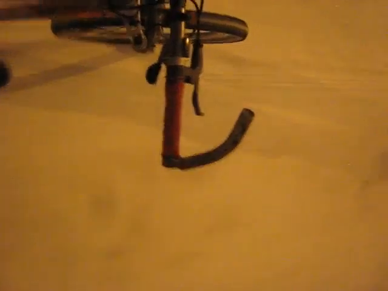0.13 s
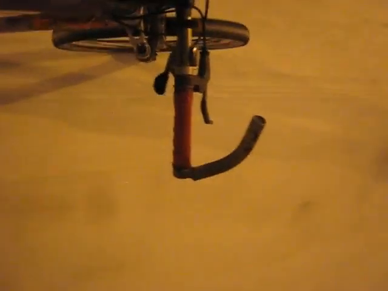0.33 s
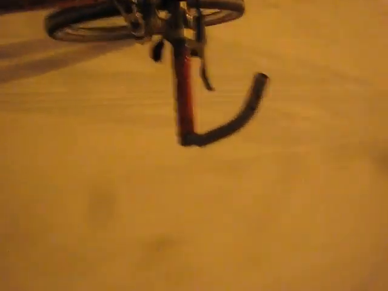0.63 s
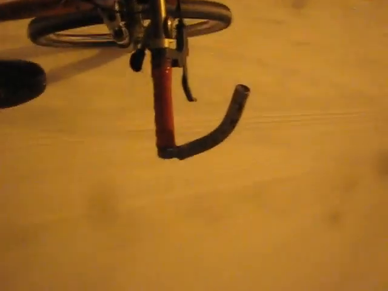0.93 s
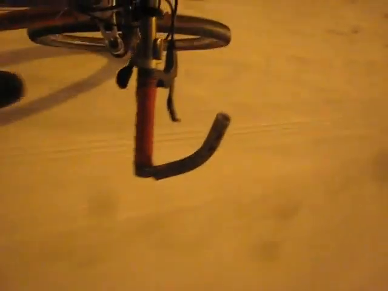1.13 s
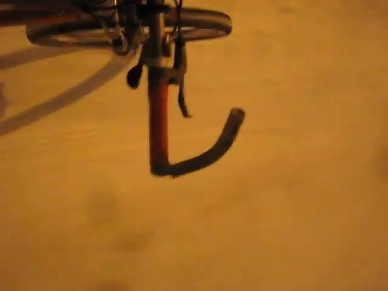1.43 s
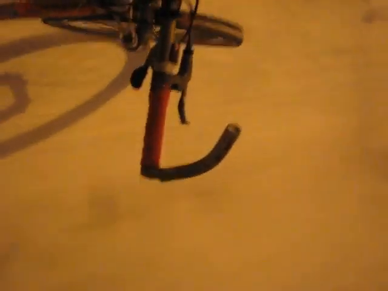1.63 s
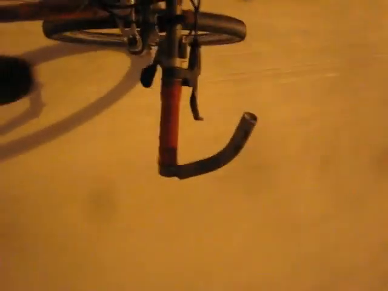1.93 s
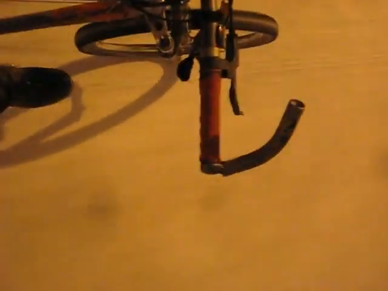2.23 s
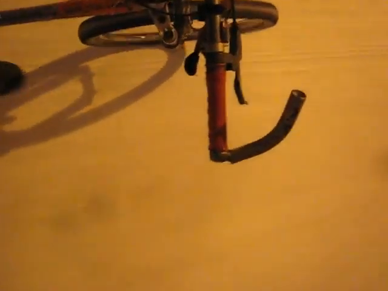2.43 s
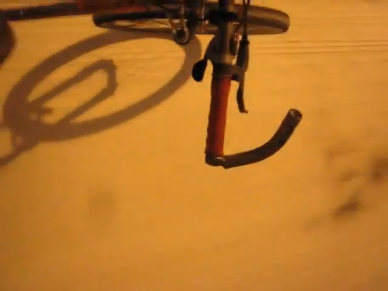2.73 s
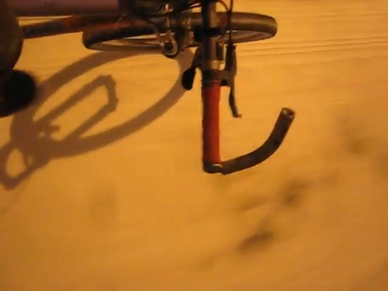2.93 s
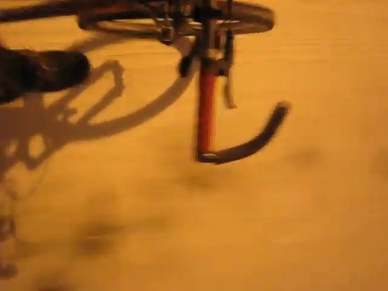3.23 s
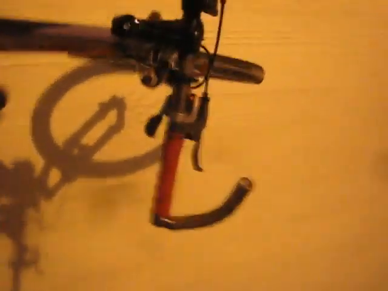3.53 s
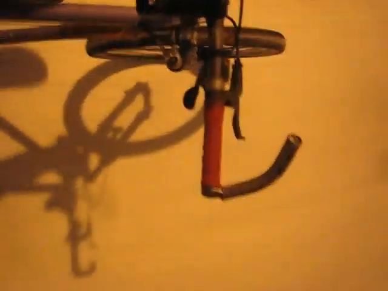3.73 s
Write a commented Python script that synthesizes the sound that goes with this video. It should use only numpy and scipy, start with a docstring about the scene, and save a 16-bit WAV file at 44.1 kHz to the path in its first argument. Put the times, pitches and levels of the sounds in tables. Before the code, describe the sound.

Headwind buffets a small microphone on a bicycle rolling over snow outdoors; strong uneven gusts and sharp flapping slaps come first, then weaker rumble, with faint tyre rush and tiny metal ticks.

```python
"""A small camera held above a bicycle rolling over snow at night; its one microphone port faces the headwind.
After a moment of silence lumpy noise gusts buffet the port, brighter as their flutter share grows; before 2 s
the strong ones level off at a common strength, and short wavering slaps crowd near 1.6 s; later the gusts are
mostly weaker, with some dull thuds. Below run deep noise swings and the tyres' rush of random grains and smooth
noise; the bike ticks as dying sines at the start, near 2.1 s and after 3.1 s, over a faint filtered noise hiss."""
import sys
import numpy as np
from scipy import signal
from scipy.fft import rfft, irfft
from scipy.io import wavfile
from scipy.ndimage import uniform_filter1d

SR = 44100
rng = np.random.default_rng(int(sys.argv[2]) if len(sys.argv) > 2 else 0)


def to_wav(sig):
    """Store sig (one row per channel, or 1-D mono) as 16-bit WAV at the path in sys.argv[1].

    Samples outside -1..1 are clipped; the rate is SR.
    """
    pcm = np.clip(np.atleast_2d(sig), -1, 1) * 32767
    pcm = np.round(pcm).astype(np.int16)
    wavfile.write(sys.argv[1], SR, pcm.T)  # frames by channels


def elevation(decibels):
    """Turn decibel levels (scalar or array-like) into linear amplitude ratios."""
    levels = np.asarray(decibels, float)
    return 10 ** (levels / 20)


N = 170667  # length in samples


def rms_one(x):
    """Scale to rms 1."""
    return x / np.sqrt(np.mean(x ** 2) + 1e-20)


def in_time(rows):
    """Join each column of a timed table by straight lines in time."""
    seconds, *columns = np.transpose(rows)
    return [np.interp(np.arange(N) / SR, seconds, column) for column in columns]


def at_hz(points, hz):
    """Read a table of (Hz, value) on a log-frequency axis."""
    table_hz, values = np.transpose(points)
    return np.interp(np.log(hz), np.log(table_hz), values)


def drift(rate_hz):
    """Random wander of spread 1: noise through a two-pole low-pass, made at a twentieth of the sample rate."""
    pole = np.exp(-40 * np.pi * rate_hz / SR)
    noise = rng.standard_normal(N // 20 + 2002)
    slow = signal.lfilter([1], [1, -2 * pole, pole * pole], noise)[2000:]  # past the filter's settling
    return np.interp(np.arange(N) / 20, np.arange(len(slow)), rms_one(slow))


def bands(x, spectrum, centres):
    """Colour x and split it into overlapping bands that sum to the whole."""
    hz = np.maximum(np.arange(N // 2 + 1) * SR / N, 1)
    shaped = rfft(x) * elevation(at_hz(spectrum, hz))
    weights = [np.interp(np.log(hz), np.log(centres), row) for row in np.eye(len(centres))]
    return np.array([irfft(shaped * weight, N) for weight in weights])


def wind():
    """Eddies pass the port: faster air tilts the noise colour up, and the level comes in lumps."""
    # Buffeting at the port. Each row: time in seconds, level in dB before levelling off,
    # share of the 400-1500 Hz flutter in dB.
    gust_rows = [(0.04, -9, -12.5), (0.06, -32, 5), (0.07, -23, -15.5), (0.194, -14, -12.5),
                 (0.22, -23, -14.5), (0.278, -13.5, -10.5), (0.3, -49, -10), (0.31, -22, -18.5),
                 (0.39, -12.5, -12.5), (0.416, -18, -19), (0.432, -30.5, -7), (0.464, -20, -20),
                 (0.476, -34.5, -17.5), (0.496, -6, -18), (0.582, -13.5, -17), (0.65, -29, -10),
                 (0.768, -9, -13.5), (0.848, -13, -13), (0.864, -18.5, -13), (0.906, -17.5, -8),
                 (0.928, -27, -12), (1.06, -15.5, -15), (1.066, -22, -6.5), (1.076, -15.5, -10.5),
                 (1.15, -42, -1), (1.188, -18.5, -16), (1.246, -7.5, -9), (1.268, -23, -8.5),
                 (1.316, -16, -4), (1.354, -18, -20), (1.402, 3, -9.5), (1.428, -35.5, -15.5),
                 (1.46, -11, -14.5), (1.53, -17, -11.5), (1.56, -11, -6.5), (1.598, -22, -6.5),
                 (1.614, -35, -5), (1.668, -11, -10.5), (1.688, -26, -9.5), (1.71, -19.5, -8.5),
                 (1.755, -10.5, -7.5), (1.785, -22, -8), (1.832, -9, -11), (1.854, -17.5, -10.5),
                 (1.95, -28, -10), (1.96, -21.5, -11.5), (1.99, -40.5, -14), (2.082, -13.5, -14),
                 (2.134, -31.5, -7.5), (2.178, -26, -23.5), (2.198, -41.5, -5.5), (2.252, -40, -10.5),
                 (2.278, -28.5, -16), (2.312, -27.5, -6.5), (2.35, -23.5, -14.5), (2.412, -20.5, -14),
                 (2.422, -27.5, -27), (2.47, -29.5, -13), (2.48, -24, -32.5), (2.512, -50.5, -10),
                 (2.624, -32, -18.5), (2.646, -28.5, -14), (2.694, -42, -10), (2.714, -25, -20.5),
                 (2.73, -22, -23.5), (2.768, -43, -16), (2.804, -33.5, -12.5), (2.868, -25, -22),
                 (2.884, -53, 6), (2.906, -37, -31), (2.922, -20.5, -15.5), (2.96, -20, -12),
                 (2.98, -28, -17.5), (3.002, -32.5, -32), (3.018, -47.5, -9), (3.07, -26, -17),
                 (3.085, -19, -10), (3.124, -15, -23.5), (3.14, -29.5, -21.5), (3.182, -33, -2),
                 (3.262, -25, -27), (3.274, -47, -10.5), (3.292, -19, -11.5), (3.308, -35, -12.5),
                 (3.325, -22, -13), (3.406, -33.5, -15.5), (3.54, -27.5, -17), (3.566, -43.5, 9.5),
                 (3.676, -45, 0.5), (3.686, -21, -28), (3.705, -12, -25.5), (3.724, -43.5, -17.5),
                 (3.74, -23.5, -17.5), (3.772, -22, -16), (3.8, -19.5, -19), (3.846, -42, -8),
                 (3.86, -32.5, -15), (3.87, -21.5, -16.5)]
    # Mean colour of the buffeting. Each row: frequency in Hz, relative density in dB per Hz.
    wind_colour = [(40, -12.5), (70, -0.5), (110, 0), (200, -1.5), (320, -4), (500, -11), (700, -18.5),
                   (1000, -24.5), (1350, -39.5), (1800, -42.5), (2500, -51), (4000, -95.5)]
    # How the colour follows the flutter. Each row: frequency in Hz, change in dB per dB of flutter share.
    flutter_tilt = [(60, 0.63), (130, -0.68), (250, -0.08), (500, 1.77), (1000, 1.08), (1500, 2.5),
                    (2500, 0.5)]
    strongest_db = -15  # gusts level off here
    mean_flutter_db = -12  # flutter share at which the mean colour holds
    quicken_db, quicken_hz = 3, 110  # random swings of the flutter share
    eddy_db, eddy_hz = 2, 60  # random lumps in level
    even, even_s = 0.55, 0.023  # how far a gust holds its strength, over what time

    level_db, flutter_db = in_time(gust_rows)
    level_db = -3 * np.logaddexp(-level_db / 3, -strongest_db / 3)
    centres = np.geomspace(25, 2500, 14)
    parts = bands(rng.standard_normal(N), wind_colour, centres)
    quick_db = flutter_db - mean_flutter_db + quicken_db * drift(quicken_hz)
    gains = elevation(at_hz(flutter_tilt, centres)[:, None] * quick_db)
    # The tilt changes colour only: divide by the loudness it would add.
    total = np.sqrt(np.mean(parts ** 2, axis=1) @ gains ** 2)
    air = (parts * gains).sum(axis=0) / total
    local_power = uniform_filter1d(air ** 2, int(even_s * SR))
    air = air / (local_power + .05) ** (even / 2)
    lumps = elevation(eddy_db * drift(eddy_hz))
    return elevation(level_db) * rms_one(lumps * air)


def slaps():
    """Each slap or thud is a short swelling and dying flutter of uneven pitch, with a kink at its height."""
    # Wind slaps and, at low pitch, dull thuds. Each row: time in seconds, 2 ms ahead of the height,
    # level of the main swing in dB, its pitch in Hz.
    slap_rows = [(0.039, -19.5, 1066), (0.565, -13.5, 600), (0.899, -22, 700), (1.066, -20, 554),
                 (1.243, -15, 670), (1.371, -8.5, 413), (1.51, -41, 910), (1.542, -13, 810),
                 (1.57, -13.5, 790), (1.593, -9, 667), (1.597, -12, 800), (1.6, -16, 700),
                 (1.6295, -11.5, 750), (1.649, -17, 906), (1.66, -26, 682), (1.666, -7.5, 1126),
                 (1.67, -10.5, 835), (1.6705, -19.5, 1120), (1.675, -18, 944), (1.693, -17.5, 690),
                 (1.724, -12, 800), (1.754, -18, 970), (1.769, -18.5, 900), (1.821, -15, 794),
                 (1.837, -21, 804), (1.879, -20, 985), (2.138, -21, 715), (2.354, -13.5, 178),
                 (2.401, -13, 281), (3.061, -22.5, 333), (3.083, -11, 143), (3.293, -17, 202),
                 (3.32, -20, 263), (3.778, -16, 398), (3.79, -16, 254), (3.825, -18.5, 300)]
    cycles, rough = 0.82, 0.33  # half-width in cycles of the pitch; strength of the side pitches
    edge_db, edge_s = -15, 0.00016  # kink level against the swing; its half-width at 900 Hz pitch

    t = np.arange(-1000, 1000) / SR
    out = np.zeros(N + 2000)
    phases = rng.uniform(0, 2 * np.pi, (len(slap_rows), 4))
    for (s, db, hz), p in zip(slap_rows, phases):
        turns = 2 * np.pi * hz * t
        side = np.sin(0.49 * turns + p[1]) + np.sin(1.613 * turns + p[2]) + 0.14 * np.sin(2 * turns + p[3])
        swing = np.sin(turns + p[0]) + rough * side
        swell = np.exp(-((t - .002) * hz / cycles) ** 2)
        edge = (t - .002) / edge_s * hz / 900
        kink = np.sign(np.cos(p[0])) * 2 * edge * np.exp(-edge ** 2)
        start = int(s * SR)
        out[start:start + 2000] += elevation(db) * swing * swell + elevation(db + edge_db) * kink
    return out[1000:N + 1000]


def rumble():
    """Slow, deep pressure swings of the air stream: low noise, steadier than the gusts."""
    # Strength of the swings. Each row: time in seconds, level in dB.
    rumble_rows = [(0.04, -24), (0.4, -28), (0.6, -24), (0.65, -28.5), (0.89, -27.5), (0.94, -29.5),
                   (0.99, -26.5), (1.13, -29.5), (1.2, -28.5), (1.74, -32), (1.87, -25), (1.93, -33),
                   (2.41, -32.5), (2.57, -34.5), (2.71, -29), (2.78, -30.5), (2.97, -32.5), (3.0, -33.5),
                   (3.24, -30), (3.29, -30), (3.35, -29.5), (3.63, -38), (3.76, -31), (3.87, -30)]
    # Colour of the swings. Each row: frequency in Hz, relative density in dB per Hz.
    deep_colour = [(10, -15), (22, -2), (40, 2.5), (65, 5.5), (90, -0.5), (150, -1.5), (300, -45)]
    level_db, = in_time(rumble_rows)
    noise = bands(rng.standard_normal(N), deep_colour, [20, 300]).sum(axis=0)
    return elevation(level_db) * rms_one(noise)


def tyres():
    """Crushed snow: dense random grains over a smooth rush, patchy by band."""
    # Rush of the tyres in the snow. Each row: time in seconds, level in dB before the lift below.
    roll_rows = [(0.05, -42), (0.16, -38), (0.192, -47.5), (0.276, -44.5), (0.308, -55), (0.334, -44),
                 (0.468, -46), (0.478, -41), (0.604, -46.5), (0.61, -66.5), (0.626, -48), (0.71, -39.5),
                 (0.722, -55), (0.764, -42), (0.78, -59), (0.826, -48.5), (0.902, -51), (0.912, -53),
                 (0.996, -45.5), (1.066, -46.5), (1.128, -41), (1.24, -43), (1.256, -56), (1.272, -46),
                 (1.362, -49), (1.44, -56), (1.472, -49), (1.59, -56), (1.6, -47.5), (1.626, -57),
                 (1.652, -46), (1.658, -59), (1.674, -59), (1.69, -53.5), (1.758, -47.5), (1.774, -52),
                 (1.87, -52), (1.874, -56), (1.938, -47), (1.95, -61), (1.97, -52), (2.032, -47.5),
                 (2.038, -64), (2.064, -51.5), (2.08, -48), (2.102, -58), (2.134, -52), (2.254, -53.5),
                 (2.292, -49), (2.328, -54), (2.366, -53), (2.53, -53.5), (2.546, -48.5), (2.63, -56),
                 (2.652, -49.5), (2.662, -54), (2.678, -50.5), (3.016, -46.5), (3.028, -50), (3.06, -45.5),
                 (3.134, -47), (3.478, -45), (3.54, -40.5), (3.62, -43.5), (3.822, -44), (3.87, -43)]
    # Colour of the rush. Each row: frequency in Hz, relative density in dB per Hz.
    snow_colour = [(80, -4), (200, 13), (450, -2), (800, 11), (1200, 9), (1600, 5.5), (2100, 2.5),
                   (2700, 4.5), (3400, 2), (4000, -3), (4700, -5), (5500, -17.5), (6200, -20),
                   (6800, -21.5)]
    # Treble of the rush against its middle. Each row: time in seconds, tilt in dB per octave about 2 kHz.
    bright_rows = [(0.04, -0.2), (1.2, 0.55), (1.6, 1.5), (2.3, 1.3), (3.2, -1.3), (3.55, 0.6),
                   (3.87, -1.5)]
    lift_db = 5.5
    grains_per_s, grain_spread_db, grain_share = 2500, 2.5, .4  # the share is of power
    together_db, alone_db = .91, 1.19  # patchiness common to all bands, and of each band alone

    level_db, = in_time(roll_rows)
    tilt_db, = in_time(bright_rows)
    sizes = elevation(grain_spread_db * np.minimum(rng.exponential(1, N), 4)) * rng.choice([-1, 1], N)
    grains = rms_one(sizes * (rng.random(N) < grains_per_s / SR))
    source = np.sqrt(grain_share) * grains + np.sqrt(1 - grain_share) * rng.standard_normal(N)
    centres = np.geomspace(300, 6000, 7)
    parts = bands(source, snow_colour, centres) * elevation(np.log2(centres / 2000)[:, None] * tilt_db)
    together = together_db * drift(51)
    rush = sum(part * elevation(together + alone_db * drift(26)) for part in parts)
    return elevation(level_db + lift_db) * rms_one(rush)


def ring(s, db, hz, t60):
    """A dying sine that starts at s seconds and falls 60 dB in t60 seconds."""
    t = np.arange(int(.1 * SR)) / SR
    out = np.zeros(N + len(t))
    start = int(s * SR)
    out[start:start + len(t)] = elevation(db - 60 * t / t60) * np.sin(2 * np.pi * hz * t)
    return out[:N]


def ticks():
    """Small metal ticks from the bike: each strikes the same modes with strengths of its own."""
    # Each row: start in seconds, level in dB to which the mode levels are added.
    tick_rows = [(0.0418, -28), (0.2044, -43), (2.0762, -43), (3.1383, -40.5), (3.1632, -36.5),
                 (3.8412, -45.5)]
    # Ringing modes of the metal. Each row: frequency in Hz, mean relative level in dB, 60 dB decay in seconds.
    tick_modes = [(4450, -2, .03), (3600, -8, .006), (5100, -4, .009), (5700, -3, .008), (6300, 0, .007)]
    own_db = rng.normal(0, 2, (len(tick_rows), len(tick_modes)))
    out = np.zeros(N)
    for (s, db), extras in zip(tick_rows, own_db):
        for (hz, mode_db, t60), extra_db in zip(tick_modes, extras):
            out += ring(s, db + mode_db + extra_db, hz, t60)
    return out


def hiss():
    """The microphone's own steady hiss: noise, thin in the bass."""
    colour = [(300, -17), (2000, -1.5), (4500, -4.5), (6500, -17.5), (8000, -36.0)]  # (Hz, dB per Hz)
    noise = bands(rng.standard_normal(N), colour, [300, 8000]).sum(axis=0)
    return elevation(-53.5) * rms_one(noise)


def scene():
    """All sources reach one microphone."""
    return (rumble() + wind() + slaps() + tyres() + ticks() + hiss())[None]


def limiter(x):
    """Gain falls quickly on peaks above the limit, then recovers at a steady rate in dB."""
    limit_db, attack_s, release_db_per_s = -4.5, 0.0016, 148
    ramp = release_db_per_s * np.arange(N) / SR
    # A running maximum on a rising ramp is a peak level that falls steadily.
    held_db = np.maximum.accumulate(20 * np.log10(np.abs(x) + 1e-6) + ramp, axis=1) - ramp
    over_db = np.maximum(held_db - limit_db, 0)
    pole = np.exp(-1 / (attack_s * SR))
    return x * elevation(-signal.lfilter([1 - pole], [1, -pole], over_db))


def top_cut(x):
    """Nothing passes above the cut-off."""
    return signal.sosfilt(signal.butter(12, 6900, fs=SR, output="sos"), x)


def record(dry):
    """A limiter acts, peaks are rounded, the top is cut, and sound begins after a short silence."""
    ceiling, stop_hz, start_s = .55, 7436, .0362  # the low-pass is 60 dB down from stop_hz upward
    rounded = ceiling * np.tanh(limiter(dry) / ceiling)
    low_pass = signal.cheby2(10, 60, stop_hz, fs=SR, output="sos")
    mix = signal.sosfilt(low_pass, rounded) * (np.arange(N) >= start_s * SR)
    return top_cut(mix)


dry = scene()
out = record(dry)
to_wav(out)
```